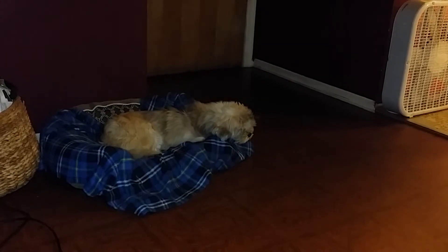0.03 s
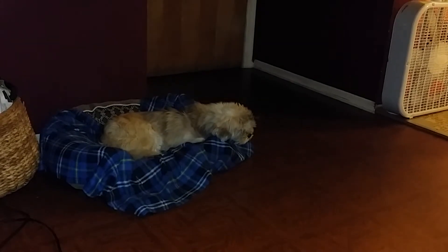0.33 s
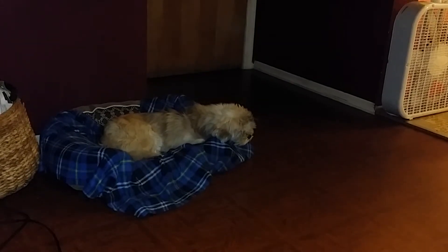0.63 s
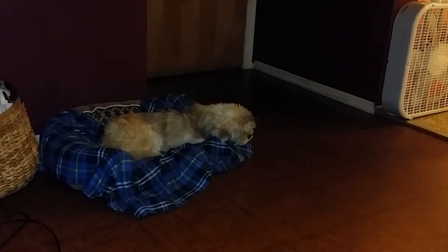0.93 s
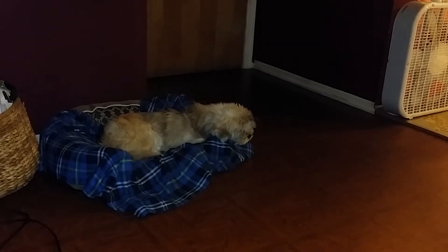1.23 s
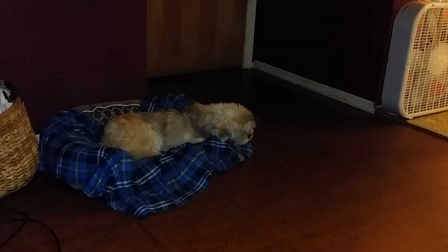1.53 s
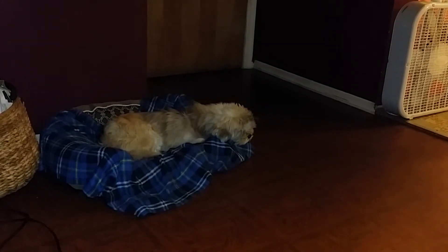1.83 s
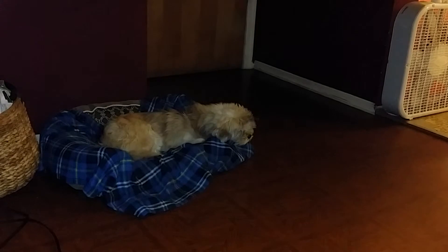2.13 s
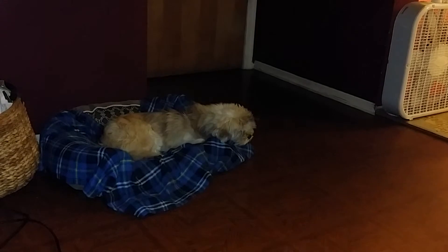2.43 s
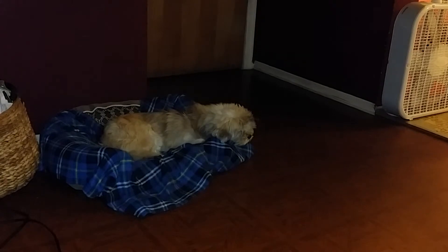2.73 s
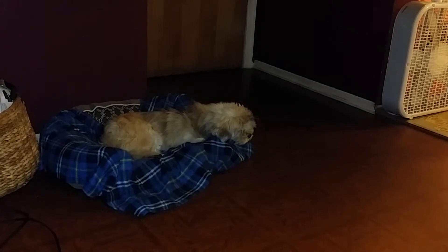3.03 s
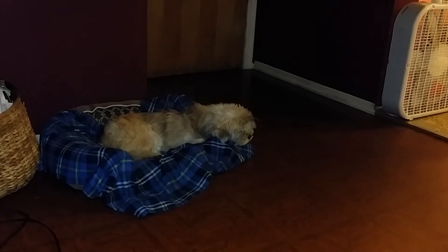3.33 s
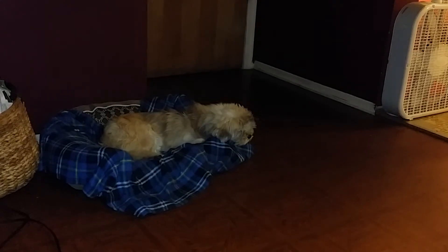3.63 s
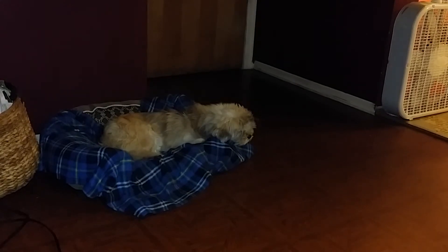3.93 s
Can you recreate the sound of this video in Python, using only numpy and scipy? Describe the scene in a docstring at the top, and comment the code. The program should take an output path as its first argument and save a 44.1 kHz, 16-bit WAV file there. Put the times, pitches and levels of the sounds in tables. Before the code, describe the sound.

A fan hums quietly in a room for the whole four seconds, its low tone pulsing about three times a second over a soft rush of air and thin microphone hiss. At about 3 seconds, a much louder, dry electrical pop thumps on the left like a knock, with no echo. Two faint ticks follow on the same side, at about 3.1 and 3.7 seconds, while the fan continues.

```python
"""A low, slowly beating hum fills a quiet room where a fan runs: mains hum and motor hum, close in
frequency, interfere over a soft rush of air and the hiss of two microphones. Late on, the left channel
jumps once with a dry, knock-like pop, then ticks twice faintly. The pops are electrical voltage steps,
so the room does not echo them."""
import sys
import numpy as np
from scipy import signal
from scipy.fft import rfft, irfft
from scipy.io import wavfile

SR = 44100
rng = np.random.default_rng(int(sys.argv[2]) if len(sys.argv) > 2 else 0)


def unload_audio(sound):
    """Save the sound as a 16-bit wav file, at the path given as the first command line argument."""
    columns = np.transpose(np.atleast_2d(sound))
    # keep every value between -1 and 1, then stretch to whole-number steps
    steps = np.round(np.clip(columns, -1, 1) * 32767)
    wavfile.write(sys.argv[1], SR, steps.astype(np.int16))


N = 176400

# mains and motor hum, at twice the supply and shaft rates: pitch_hz, left_db, right_db
HUM_TONES = [(120.0, -70.5, -67), (116.67, -73.5, -69.5)]


def beating_hum(crest_s=.115):
    """Beats: two close tones, in phase at crest_s, swell at their difference frequency, about 3 Hz."""
    t, out = np.arange(N) / SR, np.zeros((2, N))
    for pitch_hz, left_db, right_db in HUM_TONES:
        out += amp([[left_db], [right_db]]) * np.cos(2 * np.pi * pitch_hz * (t - crest_s))
    return np.sqrt(2) * out  # rms to peak


# weaker tones of the motor and blades: pitch_hz, left_db, right_db
FAN_TONES = [(59, -78, -80), (94.2, -79, -74.5), (138, -85, -86), (191.2, -83.5, -77.5), (231, -79, -78.5),
             (288.7, -81.5, -74), (291.7, -82.5, -80), (355, -92.5, -81), (378, -85, -76),
             (522, -80, -75.5), (576, -82, -85), (975, -92.5, -94), (1053, -94, -88)]


def fan_tones(waver_rad=.3, waver_db=1.4, waver_hz=2.5):
    """Phase and amplitude modulation: each tone of the motor and blades wavers slowly at random."""
    t, out = np.arange(N) / SR, np.zeros((2, N))
    for pitch_hz, left_db, right_db in FAN_TONES:
        phase = 2 * np.pi * (pitch_hz * t + rng.random()) + waver_rad * wander(waver_hz)
        swell = amp(waver_db * wander(waver_hz))
        out += amp([[left_db], [right_db]]) * swell * np.cos(phase)
    return np.sqrt(2) * out


# pops in the left channel: start_s, thump_db, tick_db
POP_EVENTS = [(2.9766, -5.5, -21.5), (3.0551, -38.5, -35), (3.7216, -43.5, -38)]
# spectrum of a voltage step after the input's bass cut: frequency_hz, relative_db
THUMP_SPECTRUM = [(12, -82), (28, -50), (40, -20), (50, -6.5), (62, -1.5), (105, 1), (200, -3.5),
                  (1000, -18.5), (2000, -26.5), (3200, -35), (4300, -43.5), (5300, -53.5), (10000, -94)]
# spectrum of the step's sharp edge: frequency_hz, relative_db
TICK_SPECTRUM = [(500, -6), (5000, -13), (10000, -15), (14000, -1), (20000, -9)]


def electrical_pops():
    """Step response of a high-pass input: a voltage jump ticks at its edge and swings back as a thump."""
    out = np.zeros((2, N))
    thump, tick = impulse(THUMP_SPECTRUM), impulse(TICK_SPECTRUM)
    for start_s, thump_db, tick_db in POP_EVENTS:
        add(out[0], start_s, amp(thump_db) * thump - amp(tick_db) * tick)
    return out


# spectral density of the moving air: frequency_hz, left_db_per_hz, right_db_per_hz
AIR_SPECTRUM = [(20, -110, -110), (32.6, -110, -111), (44.6, -98.5, -89), (70, -91.5, -92),
                (106, -94, -89.5), (160, -92.5, -90), (270, -92, -87), (424, -91.5, -86), (483, -96.5, -93),
                (630, -102, -93.5), (980, -104, -99), (1410, -110, -105), (2080, -116, -112),
                (4000, -122, -118), (9000, -132, -130)]
# likeness of the air at the two microphones: frequency_hz, correlation (-1 to 1)
AIR_CORRELATION = [(50, 0.68), (130, 0.84), (290, 0.49), (640, 0.51), (1000, -0.32), (1400, -.28),
                   (3000, 0.13)]


def air_rush():
    """Partial coherence: the broadband noise of moving air reaches both microphones partly alike."""
    return noise(AIR_SPECTRUM, AIR_CORRELATION)


# spectral density of the hiss: frequency_hz, left_db_per_hz, right_db_per_hz
HISS_SPECTRUM = [(500, -114, -115), (2000, -113.5, -115), (3240, -112, -113.5), (4360, -113.5, -115),
                 (5400, -108.5, -116.5), (6600, -106.3, -118.5), (7550, -108, -117.5), (8000, -111, -115),
                 (10400, -110, -117), (12100, -114.5, -116), (14300, -113.5, -115)]


def microphone_hiss():
    """Self-noise: each microphone adds its own hiss, uncorrelated with the other's."""
    return noise(HISS_SPECTRUM)


# slow drift of the background level: time_s, air_gain_db, hiss_gain_db
LEVEL_DRIFT = [(0, -1, -0.5), (2.15, -1.2, -0.46), (2.3, 1, -0.3), (2.45, -2.5, -1), (2.6, 0.5, 0.3),
               (2.95, -1.5, 0), (3.12, 2.5, 2.5), (3.24, -0.5, -0.5), (3.5, 0.5, 0.5), (3.77, -1, 0.9),
               (3.87, -3.5, -1), (4, 0, -0.5)]


def background(flutter_hz=14, air_flutter_db=.6, hiss_flutter_db=.15):
    """Common amplitude modulation: air and hiss drift and flutter slightly together."""
    time_s, air_db, hiss_db = np.transpose(LEVEL_DRIFT)
    t, flutter = np.arange(N) / SR, wander(flutter_hz)
    air_gain = amp(np.interp(t, time_s, air_db) + air_flutter_db * flutter)
    hiss_gain = amp(np.interp(t, time_s, hiss_db) + hiss_flutter_db * flutter)
    return air_gain * air_rush() + hiss_gain * microphone_hiss()


def amp(db):
    """The decibel scale: 20 dB is a tenfold amplitude."""
    return 10 ** (np.asarray(db) / 20)


def read(table, hz, column=1):
    """Interpolation of one column of a spectrum table on a log-frequency axis."""
    columns = np.transpose(table)
    return np.interp(np.log(hz + 1), np.log(columns[0] + 1), columns[column])


def add(mix, start_s, sound):
    """Superposition: a sound sums into the mix from start_s on."""
    part = mix[round(start_s * SR):][:len(sound)]
    part += sound[:len(part)]


def wander(rate_hz):
    """Low-passed noise: slow random motion of rms 1, up to about rate_hz."""
    hz = np.fft.rfftfreq(N, 1 / SR)
    lowpass = np.exp(-(hz / rate_hz) ** 2) * (hz > 0)
    motion = irfft(rfft(rng.standard_normal(N)) * lowpass, N)
    return motion / motion.std()


def noise(table, correlation=None):
    """Spectral shaping: white noise is filtered for each side; a shared part correlates the two."""
    hz = np.fft.rfftfreq(N, 1 / SR)
    left, independent = rfft(rng.standard_normal((2, N)))
    shared = np.clip(read(correlation, hz), -1, 1) if correlation else 0
    right = shared * left + np.sqrt(1 - shared ** 2) * independent
    spectra = [left * amp(read(table, hz, column=1)), right * amp(read(table, hz, column=2))]
    return irfft(spectra, N) * np.sqrt(SR / 2)


def impulse(table, size=16384):
    """Minimum phase: the Hilbert transform of a log spectrum yields a causal pulse, scaled to peak 1."""
    hz = abs(np.fft.fftfreq(size, 1 / SR))
    log_gain = np.log(amp(read(table, hz)))
    spectrum = np.exp(np.conj(signal.hilbert(log_gain)))
    pulse = np.fft.ifft(spectrum).real[:size // 2]
    return pulse / abs(pulse).max()


def scene():
    """Linear superposition of the fan, the pops and the background."""
    return beating_hum() + fan_tones() + electrical_pops() + background()


def record(dry, cutoff_hz=14650):
    """Band limiting: a linear-phase low-pass filter removes the highest treble."""
    lowpass = signal.firwin(767, cutoff_hz, window=("kaiser", 8), fs=SR)
    return signal.oaconvolve(dry, lowpass[None], "same")


dry = scene()
out = record(dry)
unload_audio(out)
```